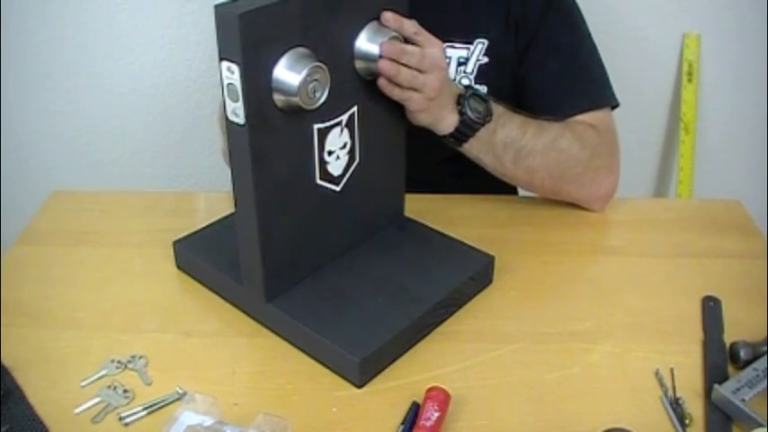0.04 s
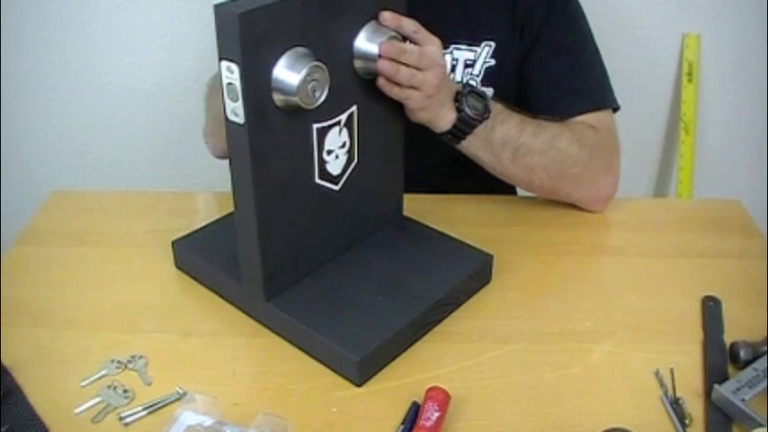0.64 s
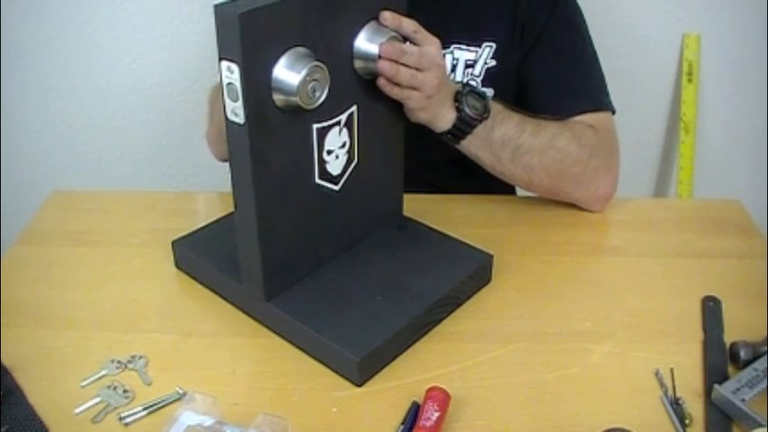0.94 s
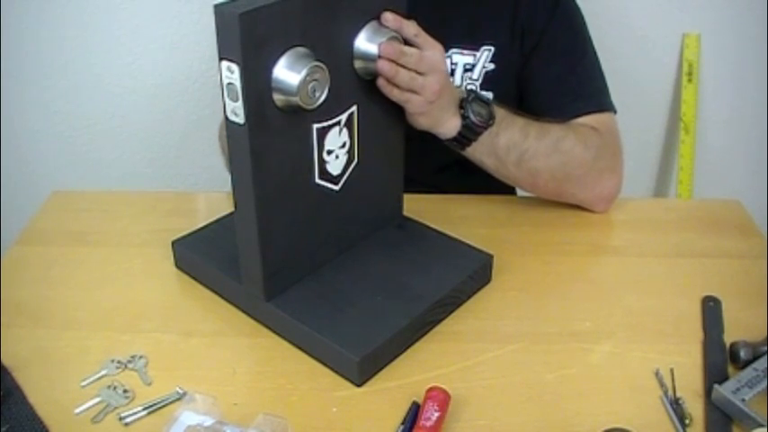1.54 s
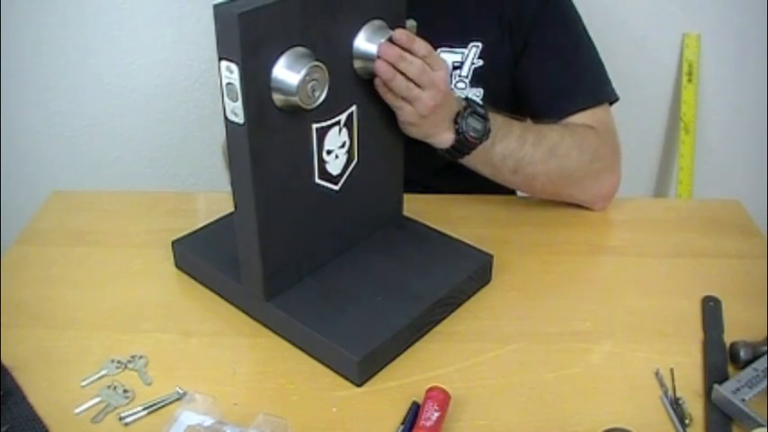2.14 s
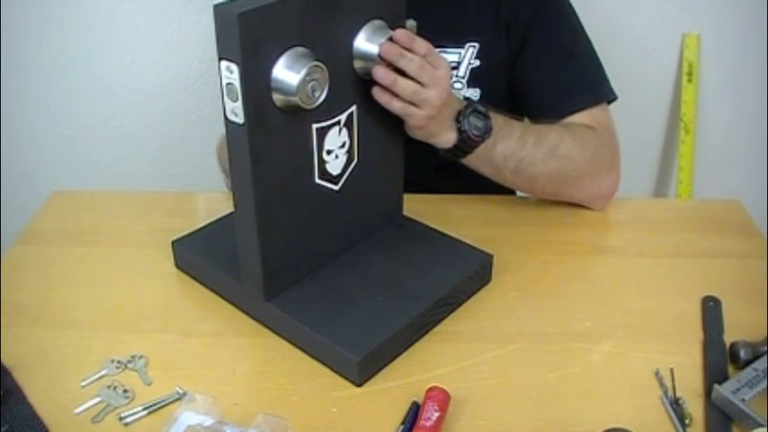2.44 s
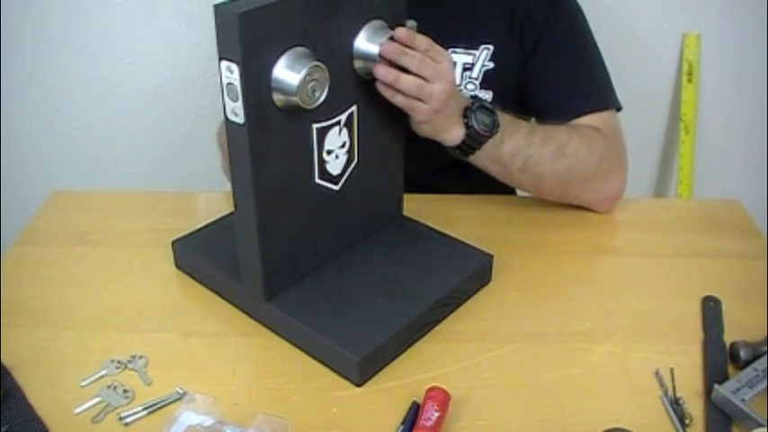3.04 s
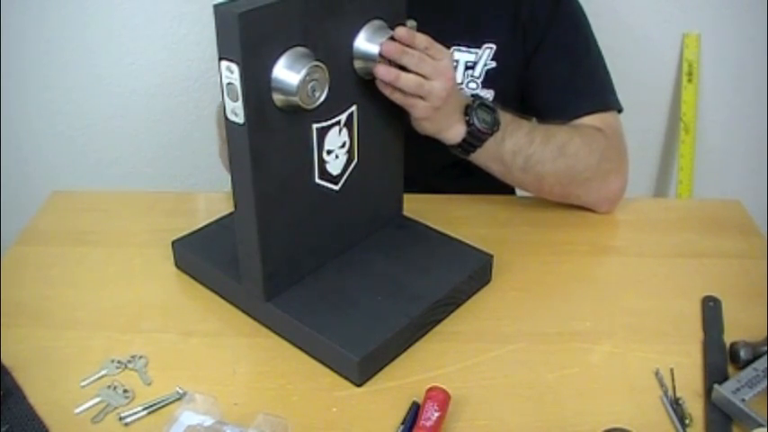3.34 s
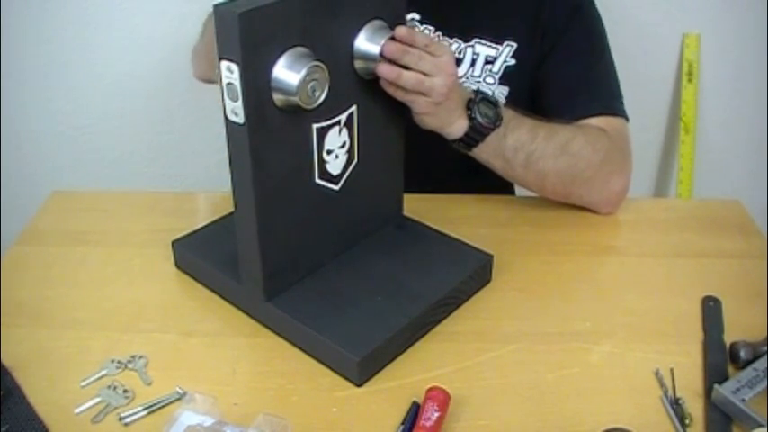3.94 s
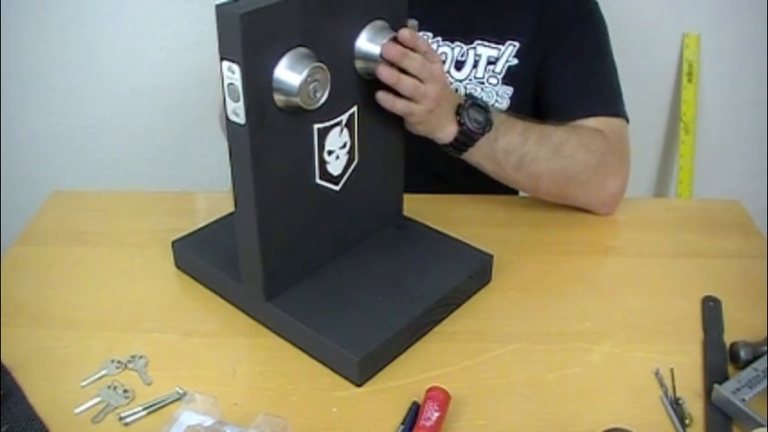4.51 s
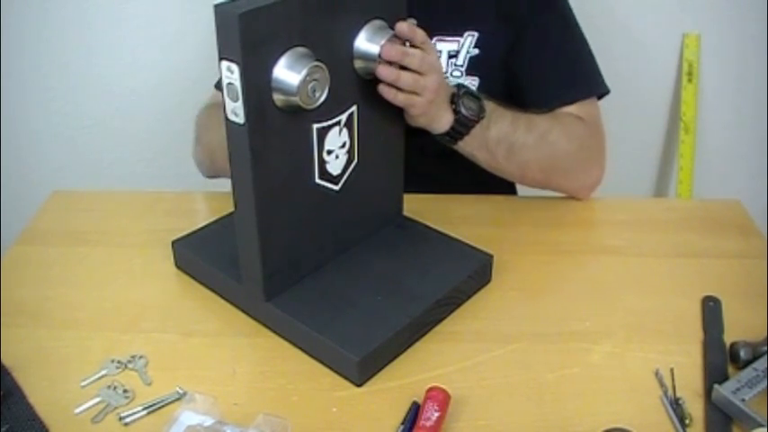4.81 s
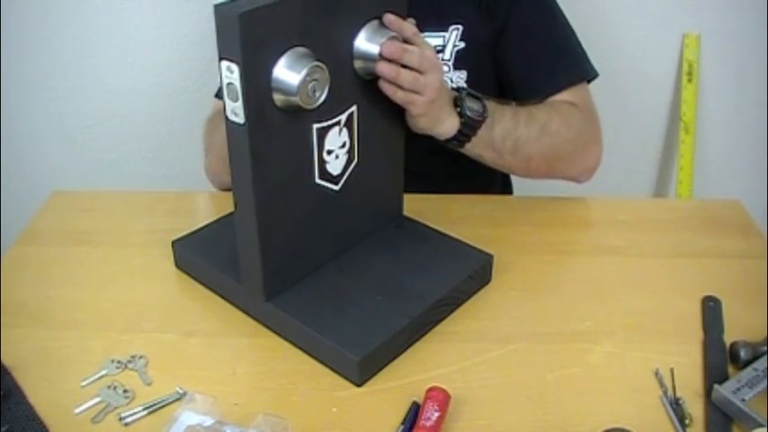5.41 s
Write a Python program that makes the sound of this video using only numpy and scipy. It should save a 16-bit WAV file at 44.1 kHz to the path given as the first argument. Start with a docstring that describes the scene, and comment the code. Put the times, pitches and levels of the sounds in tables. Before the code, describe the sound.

Steel deadbolt halves click, clack and scrape as they are fitted together through a wooden board, then snap into place.

```python
"""A small bare room with a steady hush; a metre or so away, a wooden board stands on a table.
The two halves of a steel deadbolt are lined up and pushed together through the board.
Each contact rings the stand, the board, the lock housing and the small steel parts.
Between contacts the parts rub, grate and scrape by stick-slip; late on, the connecting bar snaps home."""
import sys
import numpy as np
from scipy import signal
from scipy.fft import rfft, irfft
from scipy.io import wavfile

SR = 44100
rng = np.random.default_rng(int(sys.argv[2]) if len(sys.argv) > 2 else 0)


def inscribe(sig):
    """Save sig as 16-bit PCM at rate SR to the path in sys.argv[1].

    A 1-D sig is mono; a 2-D sig holds one channel per row.
    Samples are clipped to [-1, 1] before scaling.
    """
    pcm = np.round(np.clip(np.atleast_2d(sig).T, -1, 1) * 32767)
    wavfile.write(sys.argv[1], SR, pcm.astype(np.int16))


N = 245637


def undb(db):
    """Decibels to gain."""
    return 10 ** (np.asarray(db) / 20)


def seconds(length_s):
    """Time axis."""
    return np.arange(int(length_s * SR)) / SR


def decay(t, t60_s):
    """Exponential fall, 60 dB in t60_s."""
    return np.exp(-np.log(1000) * t / t60_s)


def unit_energy(x):
    """Scale to energy 1."""
    return x / np.sqrt(np.sum(x ** 2))


def value_at(curve, hz):
    """Interpolate (freq_hz, value) points over log frequency."""
    freq_hz, value = np.transpose(curve)
    return np.interp(np.log(np.maximum(hz, 1)), np.log(freq_hz), value)


def noise(samples, spectrum):
    """Noise shaped by (freq_hz, level_db) points."""
    gain = undb(value_at(spectrum, np.fft.rfftfreq(samples, 1 / SR)))
    return irfft(rfft(rng.standard_normal(samples)) * gain, samples)


def add(track, start_s, sound):
    """Mix a sound in at start_s."""
    i = int(max(start_s, 0) * SR)
    track[i:i + len(sound)] += sound[:max(len(track) - i, 0)]


# hush spectra, mid and side: freq_hz, relative_db
HUSH_MID = [(25, -37.5), (80, -25.5), (140, -14.5), (230, -14.5), (330, -5.5), (550, -5.5), (1050, -7),
            (2000, -12.5), (3200, -12.5), (7000, -20), (11000, -23.5), (15000, -32.5)]
HUSH_SIDE = [(15, -79.5), (25, -41), (150, -17.5), (191, -12.5), (278, -10), (344, -8), (394, -12),
             (438, -5.5), (621, -8.5), (769, -7.5), (3540, -21.5), (9770, -34), (15000, -40.5)]
def hush(spectrum, rms_db):
    """Steady background noise."""
    return undb(rms_db) * np.sqrt(N) * unit_energy(noise(N, spectrum))


# room decay: freq_hz, t60_s
ROOM_T60 = [(150, 0.47), (400, 0.33), (1000, 0.35), (2800, 0.39), (7000, 0.34), (13000, 0.25)]
# echoes re direct sound: freq_hz, level_db
ROOM_LEVEL = [(150, -13), (500, 0.5), (1500, -6.5), (3000, -2), (7000, -1), (13000, -4.5)]
# echo width: freq_hz, side_re_mid_db
ROOM_WIDTH = [(100, -3), (350, -14.5), (1200, -8), (4500, -10.5), (8000, -6), (13000, 7)]
def room_tail(side=False, rise_s=0.0036, early_db=2, early_t60_s=0.094):
    """Diffuse echoes: table and near wall first, bass lingering longest."""
    t = seconds(.8)
    edges_hz = np.r_[0, np.geomspace(120, 12000, 14), SR]
    hz = np.fft.rfftfreq(len(t), 1 / SR)
    white = rfft(rng.standard_normal(len(t)))
    early = undb(early_db) * decay(t, early_t60_s)
    build_up = np.minimum(t / rise_s, 1) ** 2
    tail = 0
    for low_hz, high_hz in zip(edges_hz[:-1], edges_hz[1:]):
        in_band = (hz >= low_hz) & (hz < high_hz)
        centre_hz = hz[in_band].mean()
        envelope = (decay(t, value_at(ROOM_T60, centre_hz)) + early) * build_up
        band = unit_energy(irfft(white * in_band, len(t)) * envelope)
        band_db = value_at(ROOM_LEVEL, centre_hz) + (value_at(ROOM_WIDTH, centre_hz) if side else 0)
        tail = tail + band * np.sqrt(in_band.mean()) * undb(band_db)
    return tail


def ring(modes, t, detune, extra_db=0):
    """Damped modes, shifted slightly at each touch by the grip of the hands."""
    hz, t60_s, db = np.transpose(modes)
    hz = hz * (1 + detune * rng.standard_normal(len(hz)))
    gain = undb(db + extra_db + rng.standard_normal(len(hz)))
    phase = rng.uniform(0, 2 * np.pi, (len(hz), 1))
    waves = gain @ (np.sin(2 * np.pi * hz[:, None] * t + phase) * decay(t, t60_s[:, None]))
    radiated_hz = [hz.min() * .85, hz.max() * 1.15]
    return signal.sosfilt(signal.butter(2, radiated_hz, "band", fs=SR, output="sos"), waves)


# steel-on-steel spectrum: freq_hz, level_db
CRACK_SPECTRUM = [(300, -53), (2000, -3.5), (3000, 0.5), (3800, 0.5), (5300, -2), (6200, -2), (7400, -7),
                  (9000, -1), (10500, -7), (13000, -16.5), (14500, -25)]
def crack(t, t60_s=.017, rise_s=0.0016):
    """Noise burst of steel hitting steel."""
    return noise(len(t), CRACK_SPECTRUM) * decay(t, t60_s) * np.minimum(t / rise_s, 1)


# modes of wooden stand, upright board, housing, steel sleeve and screws: freq_hz, t60_s, level_db
STAND_MODES = [(147, .15, -21), (209, 0.2, -8), (253, 0.113, -14), (339.7, 0.077, 2.5)]
BOARD_MODES = [(423, 0.043, -15), (570, 0.089, -15), (662.5, 0.1, -14), (760, 0.013, 0), (728.6, 0.2, -16),
               (819.4, 0.26, -16.5), (976, 0.012, -2.5)]
HOUSING_MODES = [(1125, 0.026, -4.5), (1300, 0.018, -4.5), (1516, 0.02, -2.5), (1570, 0.17, -27),
                 (1641, 0.015, 0), (1770, 0.022, -8), (2117, 0.018, -10), (2384, 0.0098, -0.5),
                 (2681, 0.015, -7.5)]
STEEL_MODES = [(6754, 0.028, -8.5), (7060, .14, -18), (7360, 0.13, -15.5), (7470, 0.0032, 12.5),
               (7880, 0.042, -7.5), (8580, .02, -12.5), (8600, 0.0062, 5), (12160, 0.0068, -4)]
def lock_body(force, pitch_hz, focus_db, stand_db, board_db, crack_db, steel_db):
    """A force rings all parts, levels re housing; the contact spot favours housing modes near pitch_hz."""
    t = seconds(.22)
    spot_db = -focus_db * np.log2(np.array(HOUSING_MODES)[:, 0] / pitch_hz) ** 2
    parts = [(crack(t), crack_db),
             (ring(STAND_MODES, t, detune=0.043), stand_db),
             (ring(BOARD_MODES, t, detune=0.013), board_db),
             (ring(HOUSING_MODES, t, detune=0.011, extra_db=spot_db), 0),
             (ring(STEEL_MODES, t, detune=0.014), steel_db)]
    return sum(undb(db) * unit_energy(signal.fftconvolve(force, part)) for part, db in parts)


def part_levels(level_db, wood_db, metal_db, medium_touch_db=-39.5):
    """Balance of the parts; for its loudness, a light touch rocks the stand more than a sharp blow."""
    stand_db = -20 + 0.33 * wood_db - 0.3545 * (level_db - medium_touch_db)
    board_db = 0.5 + wood_db
    crack_db = -1.08 + metal_db
    steel_db = -3.5 + 1.75 * metal_db
    return stand_db, board_db, crack_db, steel_db


def catches(t, rate_per_s, spread_db):
    """Random micro-impacts of rough surfaces catching and letting go."""
    hits = rng.random(len(t)) < rate_per_s / SR
    sizes = undb(spread_db * np.clip(rng.standard_normal(len(t)), -2, 2))
    return hits * sizes * rng.choice([-1, 1], len(t))


def blow(level_db, pitch_hz, rattle_db, parts_db, boost_db=22, focus_db=22):
    """One impulse at level_db + boost_db, then brief chatter of loose parts."""
    t = seconds(0.092)
    chatter = catches(t, rate_per_s=2500, spread_db=1.7) * decay(t, t60_s=0.18)
    force = undb(rattle_db) * unit_energy(chatter)
    force[0] += 1
    body = lock_body(force, pitch_hz, focus_db, *parts_db)
    return undb(level_db + boost_db) * np.linalg.norm(force) * body


def stick_slip(curve, stroke_s=.022, rate_per_s=2200, spread_db=4):
    """Friction along a level curve, one stroke per contact spot; yields start_s, mean_db, force."""
    times_s, levels_db = np.transpose(curve)
    t = times_s[0] + seconds(max(times_s[-1] - times_s[0], .01))
    for stroke in np.array_split(t, int((t[-1] - t[0]) / stroke_s) + 1):
        level_db = np.interp(stroke, times_s, levels_db)
        pressure = undb(level_db - 1 + rng.standard_normal())
        friction = unit_energy(catches(stroke, rate_per_s, spread_db) * pressure)
        yield stroke[0], level_db.mean(), np.linalg.norm(pressure) * friction


# one curve per spell of rubbing: time_s, level_db
RUB_CURVES = [
    [(0, -62.5), (.38, -65.5), (.43, -83), (.66, -65.5)],
    [(1.06, -63), (1.6, -77.5)],
    [(3.7, -75.5), (4.1, -67), (4.4, -62), (4.93, -69.5), (5.0, -63.5), (5.28, -57.5), (5.36, -55.5),
     (5.5, -59.5), (5.57, -68.5)],
]
def rubs(pitch_hz=1650, focus_db=9, usual_db=-63):
    """Hands turn the halves against the board; more pressure gives more wood, less steel."""
    for curve in RUB_CURVES:
        for at_s, level_db, force in stick_slip(curve, stroke_s=.06, rate_per_s=1500, spread_db=5):
            press_db = level_db - usual_db
            parts_db = part_levels(level_db, -3.5 + 0.67 * press_db, -5 - 0.31 * press_db)
            yield at_s, np.linalg.norm(force) * lock_body(force, pitch_hz, focus_db, *parts_db)


def edge_ticks(rate_per_s=9, above_rub_db=4, spread_db=3, spread_oct=.18, rattle_db=-8):
    """A rubbing edge catches at random and lets go with a tiny tick."""
    for curve in RUB_CURVES:
        times_s, levels_db = np.transpose(curve)
        count = int((times_s[-1] - times_s[0]) * rate_per_s)
        starts_s = rng.uniform(times_s[0], times_s[-1], count)
        for start_s, (size, spot) in zip(starts_s, rng.standard_normal((count, 2))):
            level_db = np.interp(start_s, times_s, levels_db) + above_rub_db + spread_db * size
            pitch_hz = 1900 * 2 ** (spread_oct * spot)
            parts_db = part_levels(level_db, wood_db=-7, metal_db=-11)
            yield start_s, blow(level_db, pitch_hz, rattle_db, parts_db)


# soft pushes: start_s, level_db
BUMPS = [(1.111, -56), (1.638, -60), (3.2708, -51), (3.3854, -57), (5.020, -60)]
def bumps(pitch_hz=1600, rattle_db=5, stand_db=-3, board_db=-5, crack_db=-7, steel_db=-16):
    """Soft pushes on the lock rock the stand."""
    for start_s, level_db in BUMPS:
        yield start_s, blow(level_db, pitch_hz, rattle_db, (stand_db, board_db, crack_db, steel_db))


# housing shifts: start_s, level_db, pitch_hz
HOUSING_TICKS = [(.2415, -54, 1970), (0.4527, -51, 2400), (.5464, -50, 1770), (0.6752, -44, 1840),
                 (2.058, -62.5, 3000), (3.579, -43.5, 1920), (3.6618, -49.5, 2100), (3.9387, -54, 1640),
                 (4.088, -55.5, 2000), (4.1109, -39, 1640), (4.1591, -40, 2534), (4.5176, -41.5, 2704),
                 (5.122, -53.5, 1800), (5.149, -46, 1860), (5.222, -50.5, 1983), (5.3939, -45, 2080)]
def housing_ticks(wood_db=-8, metal_db=-19, rattle_db=-7):
    """The housing shifts in its hole with a dull tick."""
    for start_s, level_db, pitch_hz in HOUSING_TICKS:
        yield start_s, blow(level_db, pitch_hz, rattle_db, part_levels(level_db, wood_db, metal_db))


# feeling for the slot: start_s, end_s, level_db
GRATES = [(2.737, 2.805, -46.5), (2.853, 2.892, -40.5), (2.941, 2.977, -43.5)]
# singing modes: freq_hz, t60_s, level_db
SQUEAL_MODES = [(2160, 0.087, -5), (2270, 0.046, -4)]
def grates(pitch_hz=1950, focus_db=26, stand_db=-33, board_db=-9, crack_db=-11, steel_db=-15):
    """Steel grates evenly on steel, driving a narrow squeal."""
    for start_s, end_s, level_db in GRATES:
        for at_s, _, force in stick_slip([(start_s, level_db), (end_s, level_db)]):
            resonance = ring(SQUEAL_MODES, seconds(.22), detune=.004)
            squeal = undb(-2) * unit_energy(signal.fftconvolve(force, resonance))
            body = lock_body(force, pitch_hz, focus_db, stand_db, board_db, crack_db, steel_db)
            yield at_s, np.linalg.norm(force) * (body + squeal)


# parts sliding home: start_s, end_s, level_db, change_db, pitch_hz, wood_db, metal_db
SCRAPES = [(.663, 0.738, -60, 2.5, 1900, -2.5, -0.5), (0.781, 0.965, -35.5, -4, 1750, -6, -3.5),
           (0.966, 1.066, -38.5, -26, 1720, -14, 2), (2.492, 2.529, -61, 5.5, 1700, -31, 3),
           (2.604, 2.645, -71, -6, 1900, -15, 3.5), (2.71, 2.734, -66.5, 4, 1880, -7, 4),
           (4.194, 4.276, -37.5, -19, 1190, -2, 2.5), (4.306, 4.371, -53.5, -13, 1390, 7.5, -12),
           (4.952, 4.988, -69, -12, 1804, 6, 5)]
def scrapes(focus_db=15):
    """Metal drags over metal and wood, swelling or fading linearly in dB."""
    for start_s, end_s, level_db, change_db, pitch_hz, wood_db, metal_db in SCRAPES:
        for at_s, stroke_db, force in stick_slip([(start_s, level_db), (end_s, level_db + change_db)]):
            parts_db = part_levels(stroke_db, wood_db, metal_db)
            yield at_s, np.linalg.norm(force) * lock_body(force, pitch_hz, focus_db, *parts_db)


# impacts of the halves: start_s, level_db, pitch_hz, wood_db, metal_db, rattle_db
CLACKS = [ (.078, -51, 1890, -6, -3.5, 3), (.081, -37.5, 2300, -4, -10.5, -10),
          (.1226, -52, 1890, -3, -4, 4.5), (0.4746, -52, 1660, 2, -8, -0.5),
          (.695, -51, 1950, -1.5, -4, -6), (0.7115, -42.5, 2140, -12, -10.5, -17),
          (0.749, -56.5, 1800, -8, 14.5, 4.5), (0.7538, -27, 2520, -14, -22, -16),
          (0.7695, -23.5, 2140, -19.5, 0, -1.5), (.778, -39, 1940, -10.5, 10, -27),
          (.835, -28.5, 1640, -4, 1.5, -1), (.8388, -26, 1670, 4.5, -4, -5.5),
          (.848, -33.5, 1650, 3, 7.5, -6), (.914, -38.5, 1700, -1, 2.5, 2),
          (0.9666, -18.5, 1765, -13.5, -5, -5.5), (.992, -34, 1710, 3, -2, -4),
          (1.1109, -45.5, 1730, -1, -15, 0.5), (1.638, -57.5, 2040, 3, -0.5, 0.5),
          (2.733, -37.5, 1910, -13, 2, -0.5), (2.852, -46, 2200, 0.5, 1.5, -3.5),
          (2.9297, -40.5, 1969, -7, -7.5, -13.5), (3.463, -44.5, 2190, -3, -3.5, 3.5),
          (3.5197, -42.5, 1790, -3, -8.5, -2.5), (4.130, -52, 1788, 1, -2.5, -1),
          (4.165, -29, 2670, -12, -11, 3), (4.1729, -24.5, 1760, -5, -15, -10),
          (4.1869, -15, 1245, -8.5, -6.5, -11), (4.203, -36.5, 1250, 3.5, 0, 1.5),
          (4.2979, -32, 1440, 2.5, -15, -11), (4.3844, -56, 1610, -5.5, -1.5, -2),
          (4.4889, -53, 1770, -11, 1, 2), (5.019, -52.5, 1763, 7, -1, 1.5), (5.030, -52, 1827, 0, 5, 1),
          (5.338, -41.5, 1767, -11, -8.5, -15)]
def clacks():
    """The halves strike each other and the board."""
    for start_s, level_db, pitch_hz, wood_db, metal_db, rattle_db in CLACKS:
        yield start_s, blow(level_db, pitch_hz, rattle_db, part_levels(level_db, wood_db, metal_db))


# connecting bar modes: freq_hz, t60_s, level_db
BAR_MODES = [(970, 0.092, -5), (1100, 0.17, -17), (1213, 0.078, -6), (1385, 0.2, 0), (1520, 0.06, 3),
             (4050, 0.26, -22), (4430, 0.33, -18), (4635, 0.06, 4), (4810, 0.016, 12.5), (5380, 0.017, 14),
             (5730, 0.067, -12)]
def bar_snap(start_s=4.1867, energy_db=-0.5):
    """The connecting bar snaps into its slot and rings."""
    return start_s, undb(energy_db) * unit_energy(ring(BAR_MODES, seconds(.4), detune=0.0014))


def scene(pan_left_db=0.13, direction_count=6):
    """Lock straight ahead; touches radiate in several directions by turns, each with its own echoes."""
    touches = [*clacks(), *housing_ticks(), *bumps(), *scrapes(), *grates(), *rubs(),
               bar_snap(), *edge_ticks()]
    directions = np.zeros((direction_count, N))
    for k, (start_s, sound) in enumerate(touches):
        add(directions[k % direction_count], start_s, sound)
    mid = hush(HUSH_MID, rms_db=-68)
    side = hush(HUSH_SIDE, rms_db=-61)
    for direct in directions:
        mid = mid + direct + signal.fftconvolve(direct, room_tail())[:N]
        side = side + signal.fftconvolve(direct, room_tail(side=True))[:N]
    return np.array([(mid + side) * undb(pan_left_db), (mid - side) * undb(-pan_left_db)])


def record(dry, cutoff_hz=14300):
    """Steep low-pass on the top treble."""
    return signal.sosfilt(signal.ellip(8, .2, 70, cutoff_hz, fs=SR, output="sos"), dry)


dry = scene()
out = record(dry)
inscribe(out)
```